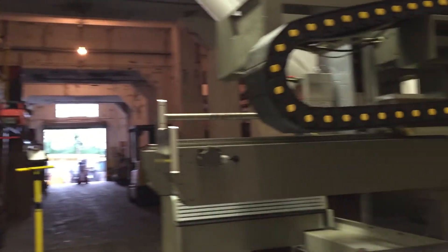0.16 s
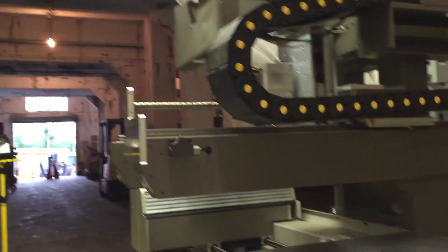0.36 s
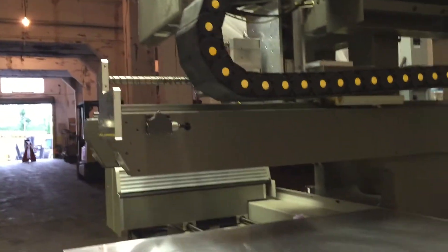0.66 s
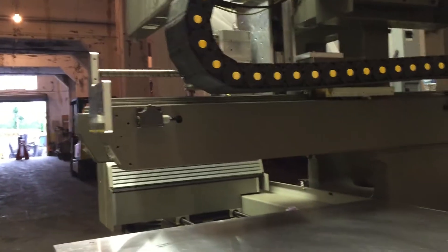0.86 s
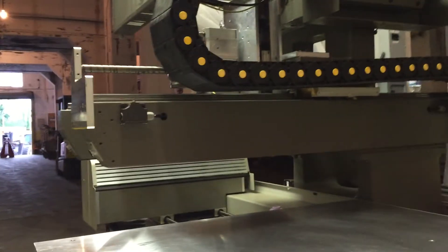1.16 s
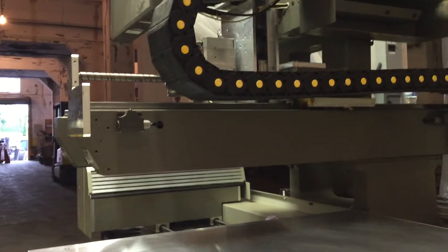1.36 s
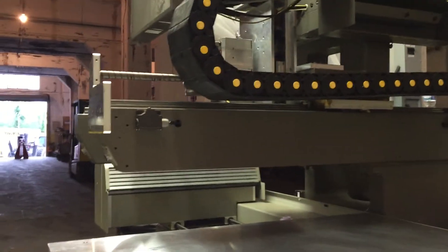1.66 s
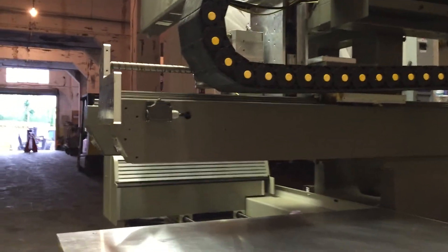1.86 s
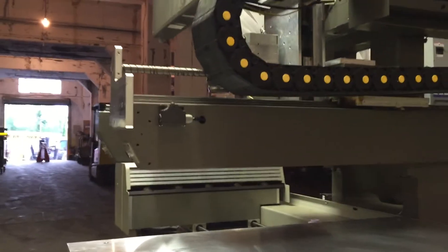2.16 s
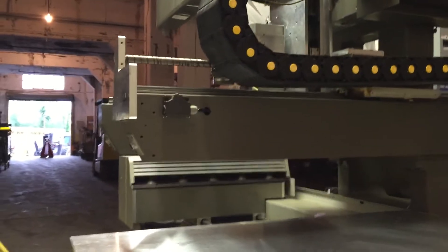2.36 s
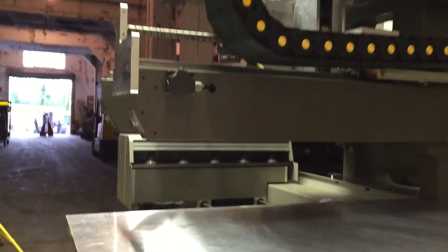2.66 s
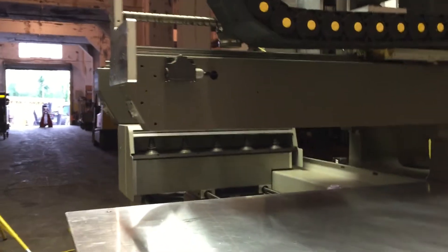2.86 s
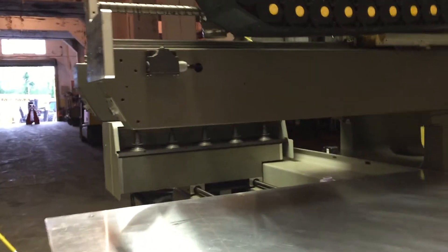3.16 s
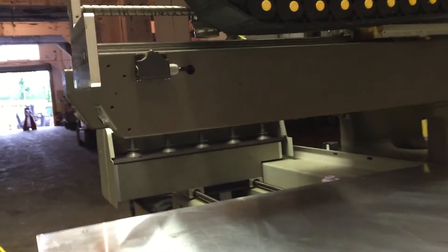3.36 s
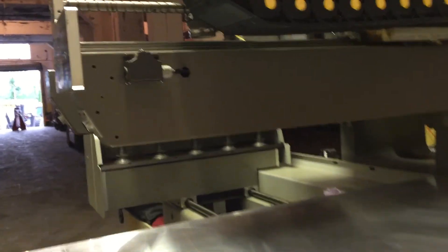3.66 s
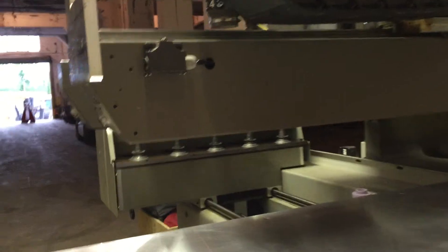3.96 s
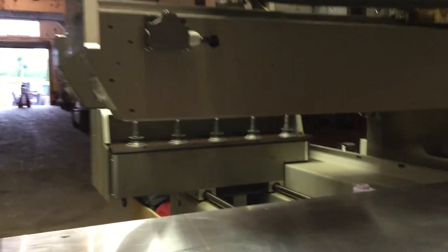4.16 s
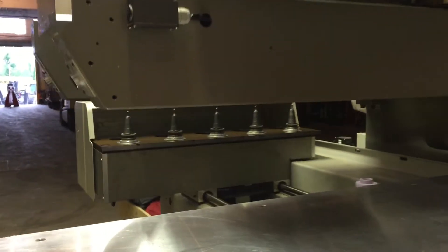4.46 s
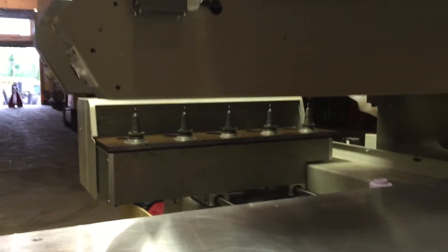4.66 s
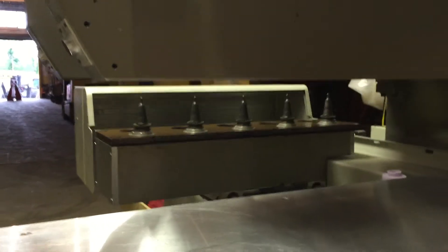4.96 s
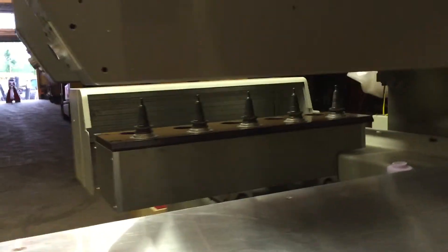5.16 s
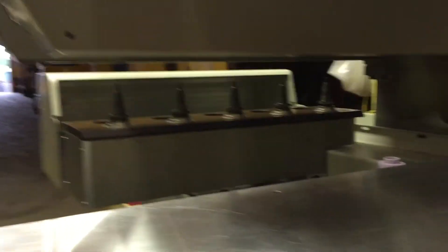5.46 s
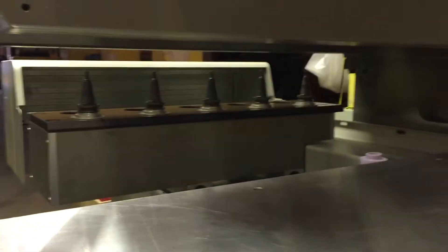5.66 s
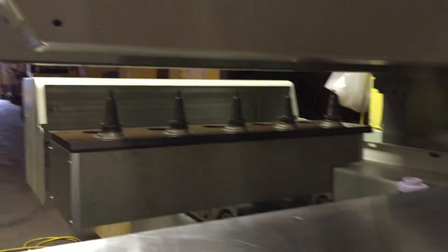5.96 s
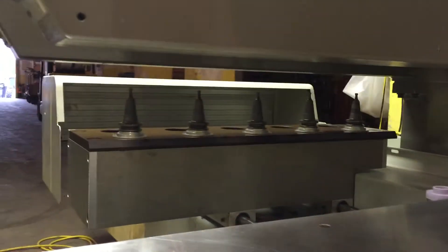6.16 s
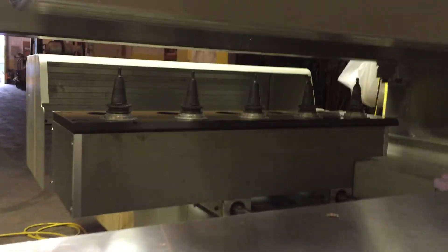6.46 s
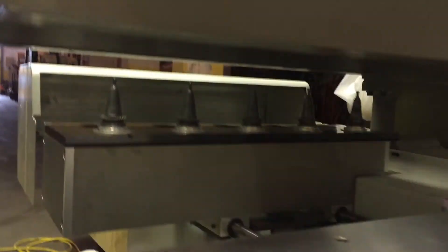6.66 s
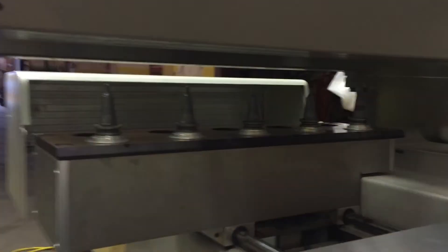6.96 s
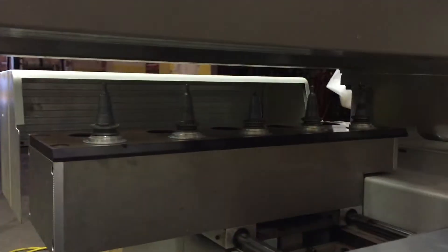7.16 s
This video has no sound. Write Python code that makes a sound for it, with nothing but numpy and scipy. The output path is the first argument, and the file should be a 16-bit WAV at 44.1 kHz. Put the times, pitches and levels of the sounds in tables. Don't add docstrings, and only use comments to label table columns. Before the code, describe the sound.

Rolling machinery whines down, quiet air leaks, a loud compressed-air blast hisses for nearly two seconds, metal stops clack, and the gantry rumbles off with knocks.

```python
import sys
import numpy as np
from scipy import signal
from scipy.fft import rfft, irfft
from scipy.io import wavfile
from scipy.ndimage import uniform_filter1d

SR = 44100
rng = np.random.default_rng(int(sys.argv[2]) if len(sys.argv) > 2 else 0)


def field_ratio(decibels):
    return 10 ** (np.asarray(decibels, dtype=float) / 20)


def output_pcm(signal):
    pcm = np.clip(np.atleast_2d(signal).T, -1, 1) * 32767
    wavfile.write(sys.argv[1], SR, np.round(pcm).astype(np.int16))


N = 321930
T = np.arange(N) / SR

# start, cruise from, cruise to and stop in seconds, motor tone in Hz.
MOVES = [
    (-1.0, -0.5, 0.48, 0.97, 206),
    (6.062, 6.5, 6.93, 7.4, 242),
]
# level in dB, frame ringing in dB.
MOVE_DB = [
    (-2.5, -9.5),
    (-1.3, 0),
]
SPEED_LAYERS = {"rumble": (-28, 9.5, 2.5, 53), "rattle": (-33.5, 23, 3, 91), "hiss": (-53, 40, 4, 140),
                "shake": (-40.5, 9, -7, 64), "sidebands": (-67.5, 19, 13, 72)}
# Hz, dB per Hz.
RUMBLE = [(82, -66), (140, -6), (237, -0.5), (307, -10), (393, -3.5), (430, -8), (494, -1.5), (803, -14),
          (941, -14), (1500, -42), (1950, -34), (3300, -120)]
# Hz, dB per Hz.
RATTLE = [(530, -2), (900, -2.5), (1130, -4), (1400, -0.5), (2690, -11), (2940, -10), (4470, -21.5),
          (4920, -35), (6000, -23), (7800, -43), (13200, -120)]
# Hz, dB per Hz.
SEAL_HISS = [(2500, -12), (4500, -1.5), (7000, -3), (10000, 0), (13000, -9), (15300, -7.5)]
# Hz, dB per Hz.
FLOOR_SHAKE = [(30, -30), (50, 8), (65, 3), (86, 8.5), (110, 13), (150, -31), (200, -45)]
# Hz, width in Hz, dB.
FRAME = [(94, 36, 17), (182, 12, 7), (278.7, 4.5, 15.5), (402, 6.3, 6), (490, 18, -15), (520, 9.8, -11),
         (638, 7.9, 3), (1045, 42, -42), (1140, 32, -32)]
# Hz, width in Hz, dB.
GROAN = [(354, 290, -1), (492, 80, -11)]
# seconds, dB.
MOTOR_LOAD = [(6.2, -14), (6.43, 0), (6.47, 6), (6.57, 8), (6.62, 3), (6.72, 2.5), (6.8, 2), (6.91, 0.5),
              (6.95, -5), (7.0, -14)]
# seconds, dB.
WHINE_SWELLS = [(0.015, -50.5), (.07, -57), (.12, -57), (.165, -61), (.21, -55), (.268, -56), (.33, -47.5),
                (.375, -53), (.43, -59), (.49, -64), (.6, -59), (.64, -56), (.68, -57), (.75, -62),
                (0.801, -58), (.85, -64), (6.07, -63), (6.11, -60.5), (6.16, -59), (6.25, -54.5),
                (6.3, -50.5), (6.36, -50), (6.4, -45.5), (6.44, -45), (6.49, -50), (6.54, -50),
                (6.628, -48.5), (6.698, -47.5), (6.73, -51), (6.804, -52.5), (6.85, -54), (6.92, -58),
                (7.01, -57), (7.05, -56), (7.08, -62), (7.19, -64), (7.22, -58), (7.255, -57.5)]
# multiple of the switching tone, dB.
STANDSTILL = [(1, -74), (3, -73)]
# seconds, knock in dB, tick in dB, tick in Hz.
LINKS = [
    (.307, -41, -29, 10900),
    (6.24, -28, -39, 8500),
    (6.393, -23, -49, 7500),
    (6.598, -11.5, -34, 12400),
    (6.783, -14, -33, 9000),
    (6.988, -20, -27.5, 6300),
]
# Hz, dB per Hz.
LEAK_AIR = [(410, -27), (700, -10), (839, -16), (930, -6), (1240, -13.5), (1520, -6.5), (1620, -8.5),
            (1770, -6.5), (4380, 2.5), (8670, -3.5), (10700, -9.5), (13100, -21), (15300, -2.5)]
# Hz, dB per Hz.
PUFF_AIR = [(880, -12), (1500, -4.5), (2010, -2), (2190, -15), (3020, 0), (3630, -6), (8970, 2),
            (15300, -2.5)]
# seconds, peak dB, rise in seconds.
PUFFS = [
    (1.557, -42, .002),
    (1.574, -29, 0.0046),
    (3.486, -28, 0.0076),
]
# Hz, dB per Hz.
JET_AIR = [(2060, -20), (3500, -3.5), (4090, -5.5), (6630, -4), (7860, -8), (9150, -7.5), (10500, -17),
           (13600, -35), (22000, -120)]
# Hz, dB per Hz.
ROAR_AIR = [(470, -57), (800, -14), (1410, -1.5), (1530, 3.5), (1620, 0), (1770, 1.5), (1920, -0.5),
            (2520, 0.5), (3110, 5), (3900, -4), (6000, -10.5), (7800, -48), (13200, -120)]
# Hz, dB per Hz.
NOZZLE_AIR = [(7000, -13.5), (9300, -1), (10500, 0), (12000, -2), (14000, -2), (15400, -4.5)]
# Hz, width in Hz, dB.
PIPES = [(1606, 150, -26), (1765, 36, 4), (2670, 47, -19), (3230, 69, 6), (4600, 120, 6)]
# seconds, Hz, dB.
MUFFLER = [(3.52, 3150, -14), (3.62, 3210, -7), (3.78, 3396, -10), (3.92, 3200, -1), (4.05, 3156, -5),
           (4.17, 3147, -1), (4.26, 3004, -1.5), (4.48, 3020, -4), (4.58, 3050, -9), (4.73, 2930, -2),
           (4.801, 3014, -4), (4.95, 2975, -8), (5.06, 2970, -16), (5.15, 2950, -3), (5.25, 3000, -15),
           (5.4, 3020, -32)]
# seconds, thud in dB, body in dB, clank in dB,
# 60 dB decay in seconds.
STOPS = [(.296, -47, -64, -60, 0.098), (1.559, -38.5, -50, -56, 0.18), (1.575, -35.5, -38.5, -48, 0.19),
         (2.049, -48, -47, -42, 0.26), (2.075, -48, -55, -60, 0.18), (3.456, -41, -51, -60, 0.31),
         (3.478, -52, -48, -60, 0.17), (3.492, -37.5, -37, -56, 0.2), (5.216, -55, -28, -24.5, 0.18),
         (5.233, -53, -27, -33, 0.18), (5.272, -59, -50, -30, 0.17), (5.316, -50, -29, -29, 0.06),
         (5.532, -46, -31, -33, 0.075), (5.539, -44, -25.5, -35, 0.1), (5.56, -61, -32, -45, 0.13),
         (6.072, -59, -65, -54, 2.2), (6.15, -62, -42.5, -67, 3.1)]
# Hz, width in Hz, dB.
STOP_BODIES = [
    [(170, 82, 2), (280, 93, -2.5), (323, 28, -28)],
    [(418, 180, -5.5), (586, 150, -7.5), (705, 260, -9)],
    [(1114, 220, 5.5), (1360, 640, 1), (2030, 180, -9)],
]
# seconds, dB.
SLIDING = [(4.1, -66), (4.4, -54.5), (4.8, -46.5), (5.2, -46.5)]
# Hz, width in Hz, dB.
RAIL_HUM = [(361, 10, 2), (423, 21, -1), (514, 5.8, 4)]
# seconds,
# Hz, dB, rise in seconds, decay in seconds.
RINGS = [(.03, 522, -21.5, 0.0063, 0.11), (.145, 571, -25, 0.014, 0.34), (.2, 605, -27, 0.037, 0.55),
         (0.269, 184, -24.5, 0.031, 0.36), (0.331, 542, -41, 0.0091, 0.15), (.47, 490, -28.5, 0.022, 0.26),
         (0.567, 502, -24.5, 0.0065, 0.26), (0.641, 402, -20, 0.0072, 0.11), (.02, 3300, -34, 0.095, 0.53),
         (1.575, 186, -29, 0.0012, 0.23), (1.59, 2760, -27, .002, .04), (2.055, 1246, -43, .006, 0.14),
         (2.062, 1910, -49, 0.0069, 0.23), (2.076, 180, -39, .003, 0.061),
         (2.093, 160, -37.5, 0.0044, 0.19), (2.13, 170, -42, 0.0033, .06), (3.477, 211, -34, 0.0027, 0.07),
         (3.492, 217, -29.5, 0.003, 0.18), (3.516, 173, -27, 0.0041, 0.12),
         (3.53, 1830, -21.5, 0.0058, 0.11), (5.217, 1123, -24, .005, .1), (5.224, 378, -29, 0.0039, 0.17),
         (5.233, 1185, -26, .004, 0.094), (5.272, 1180, -27, .004, 0.089),
         (5.314, 1090, -23.5, 0.0025, 0.073), (5.54, 1072, -15.5, 0.006, 0.059),
         (5.544, 458, -23, .004, 0.079), (5.556, 452, -23.5, 0.0036, 0.14), (5.552, 1180, -29, .004, 0.065),
         (6.211, 530, -24, 0.0069, 0.24), (6.395, 401.3, -13, .02, 0.26), (6.47, 480, -28, 0.022, 0.34),
         (6.783, 513, -14.5, 0.0081, 0.16), (6.9, 501, -24, .004, .1), (6.945, 210, -21, .015, 0.27),
         (6.966, 510, -17, 0.0038, 0.12), (7.015, 459, -20.5, 0.0065, .15),
         (7.211, 417, -17.5, 0.0082, 0.14)]
# seconds, Hz, dB, decay in seconds.
JOLTS = [(.297, 522, -22, .12), (.358, 522, -29, .12), (.432, 603, -30, 0.11), (.52, 2960, -44, .3),
         (.831, 394, -32, 0.1), (1.577, 760, -35, 0.1), (1.576, 1100, -36, 0.014), (1.578, 299, -33, .1),
         (1.6, 330, -35, .08), (1.641, 1264, -39, .12), (1.69, 182, -37.5, .3), (1.78, 185, -44, .25),
         (2.052, 1010, -44, 0.089), (2.058, 1510, -43, .08), (2.07, 815, -42, 0.18),
         (6.986, 3000, -31, .02), (6.987, 4200, -28, .02), (6.55, 3270, -38, .3), (6.92, 3320, -38, .25),
         (1.586, 3100, -30, .03), (1.593, 700, -34, 0.044), (1.603, 3060, -32, 0.054),
         (1.62, 1470, -32, .04), (3.54, 2600, -23, .3), (3.571, 3210, -27, 0.28), (6.086, 468, -35, .1),
         (6.101, 423, -36, 0.17), (6.121, 404, -29, .2), (6.165, 530, -22, .2), (6.289, 415, -28, .12),
         (6.499, 486.3, -21, 0.28), (6.629, 973, -29, .4), (7.08, 396, -21, 0.14), (7.177, 455, -38, .1),
         (7.224, 380, -24, 0.066)]
# Hz, dB per Hz.
SHOP_LOW = [(15, -49), (25, -18), (43, 0), (91, 14), (151, 5.5), (238, 3), (320, -5), (350, -29),
            (460, -39), (770, -120)]
# Hz, dB per Hz.
SHOP_MID = [(130, 1), (220, 5.5), (314, -2.5), (638, -1.5), (818, -9), (1210, -1.5), (2500, -20),
            (4000, -22.5), (4910, -28), (6410, -32), (6760, -37), (9310, -28), (10400, -36), (15300, -32)]
# seconds, dB.
ACTIVITY = [(0.9, 2), (1.05, 2), (1.31, 0), (1.56, -2), (1.75, 4.5), (1.9, -5), (2.05, -1), (2.3, -2.5),
            (2.5, -1.5), (2.75, 4), (3.0, -3), (3.25, -5.5), (3.5, 7.5), (3.7, 0), (3.95, 3), (4.3, 12.5),
            (5.1, 9), (5.27, 15), (5.45, 12), (5.8, 8.5), (5.95, 7), (6.05, 4), (6.3, 14)]
# dB, share of the activity swing.
SHOP_LAYERS = [
    (-57.5, 0.69),
    (-55, 0.59),
    (-60.5, 1.84),
]
# seconds, gain in dB.
LOW_SWELL = [(1.15, 4), (1.35, -3), (1.5, -17), (1.8, 0.5), (3.9, 4), (5.7, 6), (7.3, 8)]
# Hz, seconds to fall 60 dB.
HALL_T60 = [(100, 1.3), (1000, 0.56), (3000, 1.1), (6000, 0.65), (15000, 0.11)]
# seconds, from Hz, to Hz.
SPLITS = [(.805, 13000, 14450), (1.838, 6900, 8270), (1.858, 5170, 7580), (2.275, 5170, 6900),
          (2.275, 11020, 13090), (2.987, 13090, 15160), (3.735, 5510, 6900), (3.735, 7580, 9650),
          (3.85, 4480, 5680), (3.85, 8960, 11020), (3.85, 11710, 14470), (4.13, 6900, 8960),
          (4.828, 6900, 8270), (4.893, 5510, 6900), (4.893, 7580, 8960), (5.152, 11020, 12400),
          (5.43, 8270, 9650), (5.94, 11020, 12400), (6.52, 6200, 7580), (6.52, 11710, 13090),
          (6.545, 7580, 8960)]

SWITCHING_HZ = 3125
LEAK_OPEN_S, LEAK_END_S = 1.557, 3.6
BLAST_OPEN_S, BLAST_SHUT_S = 3.488, 5.183
BRAKE_OFF_S = 5.93


def rms_one(x):
    return x / np.sqrt(np.mean(x ** 2) + 1e-20)


def over_time(table):
    return np.interp(T, *np.transpose(table))


def only_during(table):
    first, last = table[0][0], table[-1][0]
    return over_time([(first - .004, -120), *table, (last + .06, -120)])


def at_hz(points, hz):
    point_hz, value = np.transpose(points)
    return np.interp(np.log(hz + 1), np.log(point_hz), value)


def drift(rate):
    r = np.exp(-80 * np.pi * rate / SR)
    slow = signal.lfilter([1], [1, -2 * r, r * r], rng.standard_normal(N // 40 + 2002))[2000:]
    return np.interp(np.arange(N) / 40, np.arange(len(slow)), rms_one(slow))


def coloured(spectrum, patchy_db, rate, source=None):
    hz = np.fft.rfftfreq(N, 1 / SR)
    source = rng.standard_normal(N) if source is None else source
    shaped = rfft(source) * field_ratio(at_hz(spectrum, hz))
    out, together = 0, drift(rate)
    lowest, highest = np.log2(spectrum[0][0]), np.log2(spectrum[-1][0])
    for octave in np.arange(np.floor(lowest), highest + 1):
        band = np.clip(1 - abs(np.log2(hz + 1) - octave), 0, 1)
        out = out + irfft(shaped * band, N) * field_ratio(patchy_db * (0.39 * together + drift(rate)))
    return rms_one(out)


def resonate(x, hz, width):
    r = np.exp(-np.pi * width / SR)
    top = (1 - r * r) / 2
    return signal.lfilter([top, 0, -top], [1, -2 * r * np.cos(2 * np.pi * hz / SR), r * r], x)


def decay_after(s, rise, t60):
    return np.clip((T - s) / rise, 0, 1) * field_ratio(-60 * np.abs(T - s) / t60)


def vent(opens, rise, shuts, fall, steepen):
    after = np.clip(T - shuts, 0, None)
    return 20 * np.log10(np.clip((T - opens) / rise, 1e-6, 1)) - fall * after - steepen * after ** 2


def follows_speed():
    share, tone_hz, gain_db, frame_db, pulling = 0, 0, 0, 0, 0
    for (start, cruise, brake, stop, hz), (db, ring_db) in zip(MOVES, MOVE_DB):
        ramp = np.interp(T, [start, cruise, brake, stop], [0, 1, 1, 0])
        share = share + ramp
        tone_hz = tone_hz + hz * ramp
        breaking_free = vent(start, .05, 99, 0, 0)
        gain_db = np.where(T > start, db + breaking_free, gain_db)
        frame_db = np.where(T > start, ring_db, frame_db)
        pulling = pulling + np.interp(T, [start, cruise - .05, cruise + 0.02], [1, 1, 0], left=0)
    levels = {"frame": frame_db}
    for name, (db, law, pull_db, fall) in SPEED_LAYERS.items():
        speed_db = np.where(share > .002, law * np.log10(share + .002), -90)
        level = db + gain_db + pull_db * pulling + speed_db
        levels[name] = np.maximum.accumulate(level + fall * T) - fall * T
    brake_db = -51.5 + vent(BRAKE_OFF_S, 0.061, BRAKE_OFF_S + .25, 100, 0)
    levels["rattle"] = np.maximum(levels["rattle"], brake_db)
    changing = uniform_filter1d(1.0 * (abs(np.gradient(share)) > 1e-9), int(0.14 * SR))
    groan_db = -32.5 + gain_db + 1.3 * frame_db + 5.3 * np.log10(share + 1e-3)
    levels["groan"] = groan_db + 20 * np.log10(np.abs(changing) + 1e-6)
    return tone_hz, levels


def gantry():
    _, levels = follows_speed()
    hits = rng.random(N) < 900 / SR
    sizes = field_ratio(2.3 * np.minimum(rng.exponential(1, N), 4))
    bumps = rms_one(hits * sizes * rng.choice([-1, 1], N)) + 2.5 * rng.standard_normal(N)
    frame = 0
    for hz, width, db in FRAME:
        frame = frame + field_ratio(db + 1.5 * drift(2.1)) * resonate(bumps, hz, width) / np.sqrt(width)
    groan = sum(field_ratio(db) * resonate(resonate(bumps, hz, width), hz, width) for hz, width, db in GROAN)
    rumble = coloured(RUMBLE, 0.54, 5.6, bumps) + 0.48 * field_ratio(levels["frame"]) * rms_one(frame)
    out = field_ratio(levels["groan"]) * rms_one(groan)
    out += field_ratio(levels["rumble"] - 2.5) * rumble
    out += field_ratio(levels["rattle"] + 1) * coloured(RATTLE, 0.6, 5.6, bumps)
    out += field_ratio(levels["shake"]) * coloured(FLOOR_SHAKE, 1.9, 10)
    return out + field_ratio(levels["hiss"] + 4.5) * coloured(SEAL_HISS, 1.2, 5.5, bumps)


def drive():
    tone_hz, levels = follows_speed()
    slowing = np.gradient(tone_hz) < 0
    speeding = np.gradient(tone_hz) > 0
    turn = 2 * np.pi * np.cumsum(tone_hz + 3.99 * drift(9.73)) / SR
    carrier = 2 * np.pi * SWITCHING_HZ * T

    frame_peak_db = np.maximum(-((tone_hz - 235) / 9.3) ** 2, -40)
    tone_db = -28.5 + 2.8 * np.minimum(levels["frame"], 0) + frame_peak_db
    tone_db = tone_db + over_time(MOTOR_LOAD) + 1.2 * drift(1.1)
    harmonics = ((1, 1), (2, 0.45), (3, 0.089), (4, 0.087))
    out = field_ratio(tone_db) * sum(size * np.sin(k * turn) for k, size in harmonics)

    side_db = levels["sidebands"] - 0.6 * levels["frame"]
    braking = np.where(slowing, np.clip(tone_hz / 200, 0, 1) ** 5, 1)
    lower = 2 * np.pi * np.cumsum(np.minimum(1.08 * tone_hz, 222) + 3 * drift(12)) / SR
    lower_db = side_db + np.interp(T, [3, 6.45, 6.7], [15, 14, 8]) + 2.5 * drift(6)
    out += field_ratio(lower_db) * braking * np.sin(carrier - lower)
    for order, db in ((.8, 4), (1.8, 6)):
        with_speed = np.clip(tone_hz / 220, 0, 1) ** (3 * order - 2)
        out += field_ratio(side_db + db + 2.3 * drift(10)) * with_speed * braking * np.sin(carrier + order * turn)

    flutter = np.sin(2 * np.pi * 17 * T + 3 * np.sin(2 * np.pi * 2.3 * T))
    swells = np.max([db - 234 * abs(T - s) for s, db in WHINE_SWELLS], axis=0)
    whine_db = np.maximum(swells, -74.5 + vent(0.95, 0.03, LEAK_OPEN_S, 100, 0))
    whine_db = whine_db + 10 + 0.59 * np.roll(flutter, 9000)
    out += field_ratio(whine_db) * np.sin(2 * carrier + 0.42 * drift(11))

    law = np.where(speeding, .4, 1.6)
    out += np.clip(tone_hz / 215, 0, 1) ** law * field_ratio(-60 + 4.3 * drift(18)) * np.sin(4 * carrier)

    hold_db = sum(db * np.exp(-((T - s) / .2) ** 2) for s, db in ((1.04, 9), (5.97, 14)))
    holding = np.clip(1 - tone_hz / 90, 0, 1) * field_ratio(hold_db)
    for k, db in STANDSTILL:
        out += holding ** (1 / k) * field_ratio(db + 2.8 * drift(7.8)) * np.sin(k * carrier)
    return out


def chain():
    out, white = np.zeros(N), rng.standard_normal(N)
    bright = signal.sosfilt(signal.butter(2, [1500, 8000], "band", fs=SR, output="sos"), white)
    modes = ((200, 0.1), (410, 0.91), (560, 0.91))   # Hz, share
    for s, knock_db, tick_db, tick_hz in LINKS:
        hollow = sum(share * np.sin(2 * np.pi * hz * (T - s)) for hz, share in modes)
        tick = 2.5 * bright + 3.3 * resonate(white, tick_hz, 900)
        out += field_ratio(knock_db) * decay_after(s, 0.0033, 0.078) * hollow
        out += field_ratio(tick_db) * decay_after(s, 0.0012, 0.016) * tick
    return out


def blast_part(rise, db, surge_db, fall, steepen):
    since = np.clip(T - BLAST_OPEN_S, 0, None)
    level = db + surge_db * np.exp(-(since / 0.16) ** 2 / 2) - 0.37 * since
    level += 1.5 * vent(BLAST_OPEN_S, rise, 99, 0, 0) + vent(0, 1, BLAST_SHUT_S, fall, steepen)
    return np.maximum(level, -69 + vent(BLAST_OPEN_S, rise, 7.5, 100, 0))


def leak():
    flowing_db = vent(LEAK_OPEN_S, .003, LEAK_END_S, 300, 0)
    puff = field_ratio(-53 + flowing_db)
    for s, db, rise in PUFFS:
        puff = puff + field_ratio(db + vent(s, rise, s + rise, fall=71, steepen=360))
    steady = field_ratio(-38.6 + flowing_db) * coloured(LEAK_AIR, 0.057, 5.6)
    return steady + field_ratio(0.5) * puff * coloured(PUFF_AIR, 0.41, 12)


def blast():
    jet_db = blast_part(.045, db=-28.5, surge_db=2.5, fall=-0.5, steepen=78)
    roar_db = blast_part(.068, db=-28.5, surge_db=6.5, fall=50, steepen=-3)
    nozzle_db = blast_part(.012, db=-30, surge_db=2, fall=5, steepen=108)
    white = rng.standard_normal(N)
    pipes = sum(field_ratio(db + 1.6 * drift(3.8)) * resonate(white, hz, width) for hz, width, db in PIPES)
    s, muffler_hz, muffler_db = np.transpose(MUFFLER)
    centre = 2 * np.pi * np.cumsum(np.interp(T, s, muffler_hz) + 25 * drift(4)) / SR
    muffler = drift(90) * np.cos(centre) + drift(90) * np.sin(centre)
    roar = coloured(ROAR_AIR, 0.15, 4.7) + 0.27 * rms_one(pipes)
    roar += field_ratio(np.interp(T, s, muffler_db)) * muffler
    out = field_ratio(nozzle_db + 2.5) * coloured(NOZZLE_AIR, 0.52, 17)
    out += field_ratio(jet_db) * coloured(JET_AIR, 0.28, 25)
    return out + field_ratio(roar_db - 2.5) * roar


def stops():
    chatter, out = rng.standard_normal(N) * field_ratio(2.6 * drift(98)), np.zeros(N)
    bodies = []
    for body in STOP_BODIES:
        modes = [field_ratio(db) * resonate(resonate(chatter, hz, w), hz, 2 * w) for hz, w, db in body]
        bodies.append(rms_one(sum(modes)))
    base, cover, rack_body = bodies
    for s, thud_db, body_db, clank_db, t60 in STOPS:
        blow = field_ratio(thud_db) * base + field_ratio(body_db) * cover + field_ratio(clank_db) * rack_body
        out += decay_after(s, 0.0031, t60) * blow
    return out


def rack():
    white = rng.standard_normal(N)
    hum = sum(field_ratio(db) * resonate(white, hz, width) for hz, width, db in RAIL_HUM)
    return field_ratio(only_during(SLIDING)) * rms_one(hum)


def rings():
    song_db = only_during([(5.6, -78), (5.8, -55), (5.9, -69), (5.98, -56), (6.06, -53), (6.2, -68)])
    out = field_ratio(song_db) * rms_one(resonate(rng.standard_normal(N), 1236, 11))
    jolts = [(s, hz, db, 0.064 * t60, t60) for s, hz, db, t60 in JOLTS]
    for s, hz, db, rise, t60 in RINGS + jolts:
        out += field_ratio(db) * decay_after(s, rise, t60) * np.sin(2 * np.pi * hz * (T - s))
    return out


def shop():
    activity_db = over_time(ACTIVITY)
    low_db, mid_db, panel_db = (db + share * activity_db for db, share in SHOP_LAYERS)
    panel = rms_one(resonate(resonate(rng.standard_normal(N), 1210, 78), 1350, 200))
    out = field_ratio(low_db + over_time(LOW_SWELL)) * coloured(SHOP_LOW, 0.8, 2.6)
    out += field_ratio(mid_db + 1.5) * coloured(SHOP_MID, 1.4, 7)
    return out + field_ratio(panel_db - 14.5) * panel


def nearby_walls(x):
    t, out = T[:SR // 3], 0
    for place in range(3):
        echo = rng.standard_normal(len(t)) * field_ratio(-60 * t / 0.077) * (t > .002)
        weight = np.sqrt(2 / 3) * np.cos(2 * np.pi * (1.4 * T + place / 3))
        out = out + signal.fftconvolve(x * weight, echo / np.sqrt(np.sum(echo ** 2)))[:N]
    return signal.sosfilt(signal.butter(1, 600, "high", fs=SR, output="sos"), out)


def hall(x):
    t, tail = T[:SR], 0
    for hz in 63 * 2 ** np.arange(8):
        octave = signal.butter(2, [hz / 1.42, hz * 1.42], "band", fs=SR, output="sos")
        noise = signal.sosfilt(octave, rng.standard_normal(SR))
        tail = tail + noise * field_ratio(-60 * t / at_hz(HALL_T60, hz))
    tail = tail * np.clip((t - .004) / 0.0086, 0, 1)
    return signal.fftconvolve(x, tail / np.sqrt(np.sum(tail ** 2)))[:N]


def scene():
    links, blows, ringing = chain(), stops(), rings()
    jets = leak() + blast()
    steady = gantry() + jets + shop() + rack()
    mono = ringing + field_ratio(-0.37) * steady + field_ratio(-7) * nearby_walls(steady)
    mono += drive() + links + blows
    mono += field_ratio(-6.5) * hall(blows + 0.66 * ringing + 0.5 * links + 0.66 * jets)
    return np.stack([mono, mono])


def split_bands(mono):
    side, later = np.zeros(N), np.roll(mono, 700)
    for s, low_hz, high_hz in SPLITS:
        at = slice(round(s * SR) - 1024, round(s * SR) + 1024)
        band = signal.butter(6, [low_hz, high_hz], "band", fs=SR, output="sos")
        side[at] += np.hanning(2048) * signal.sosfilt(band, later[at])
    return field_ratio(-2) * side


def top_cut(x):
    return signal.sosfilt(signal.butter(12, 15500, fs=SR, output="sos"), x)


def record(dry):
    x = dry - 0.5 * resonate(dry, 10490, 1320)
    x = signal.sosfilt(signal.butter(2, 45, "high", fs=SR, output="sos"), x)
    x = signal.sosfilt(signal.ellip(12, .5, 80, 15270, fs=SR, output="sos"), x)
    mix = x + split_bands(x[0]) * [[1], [-1]]
    return top_cut(mix)


dry = scene()
out = record(dry)
output_pcm(out)
```